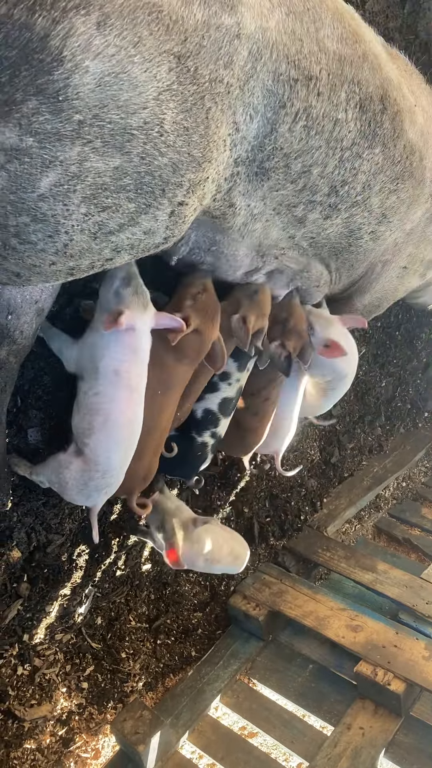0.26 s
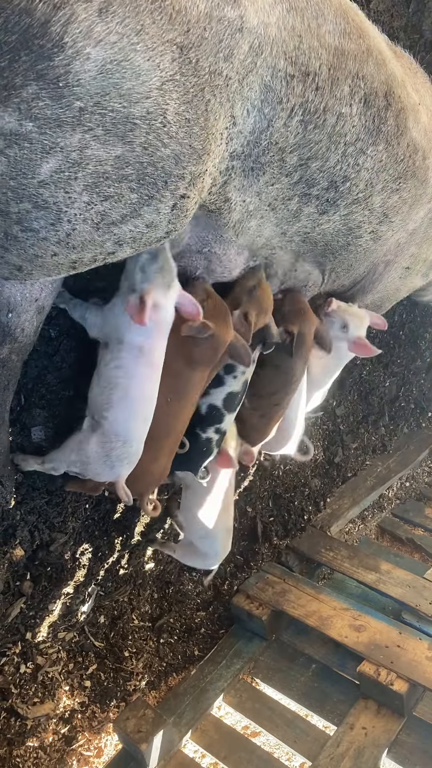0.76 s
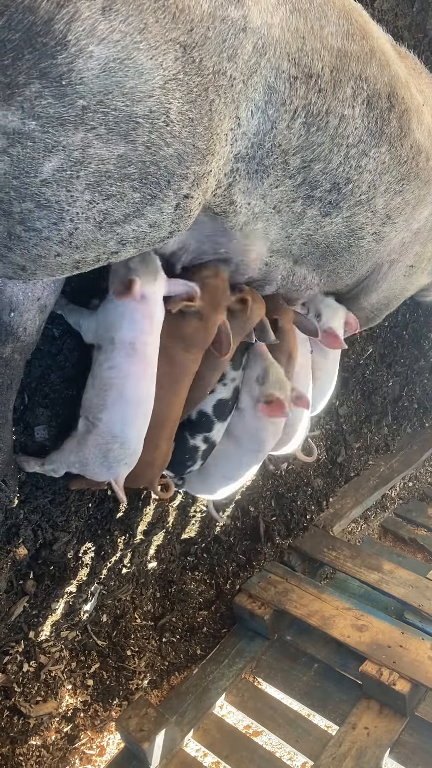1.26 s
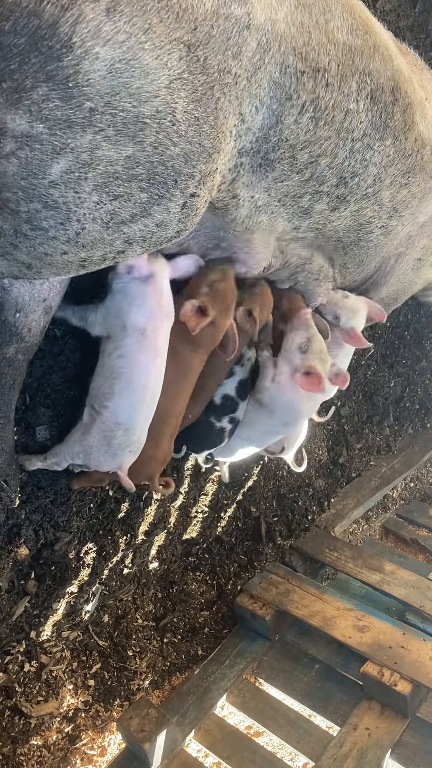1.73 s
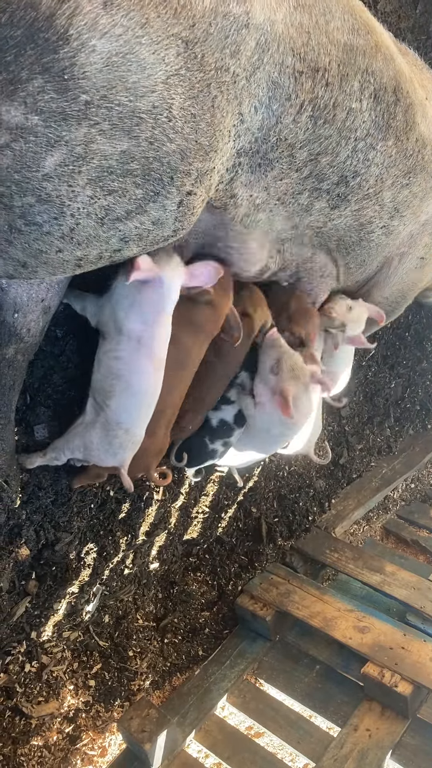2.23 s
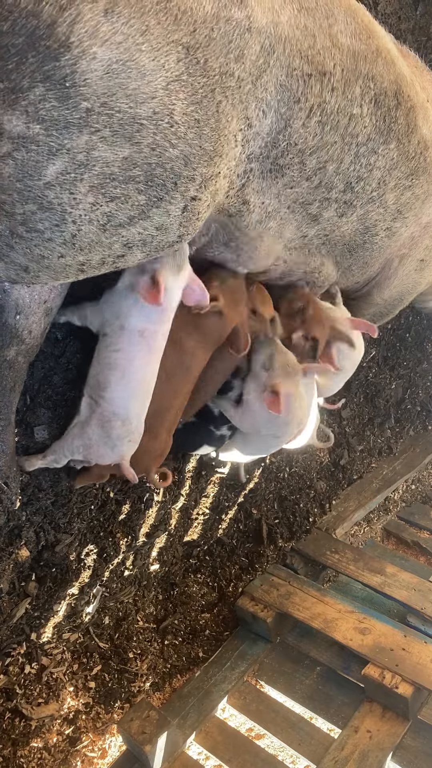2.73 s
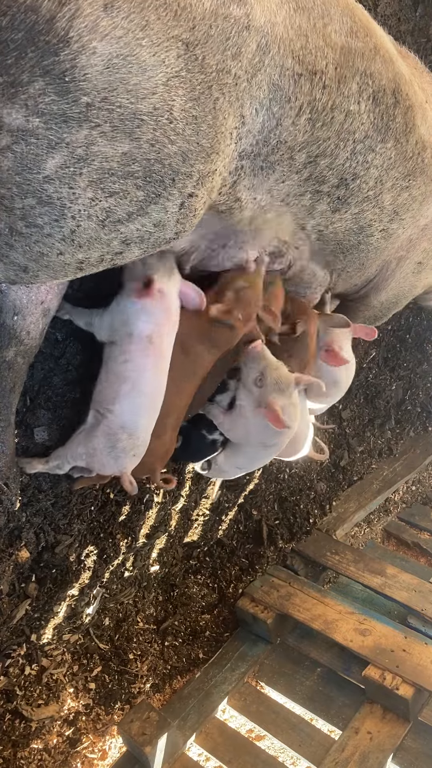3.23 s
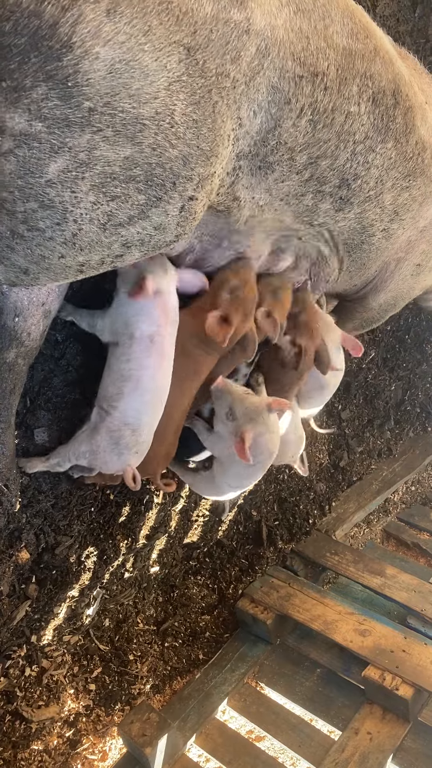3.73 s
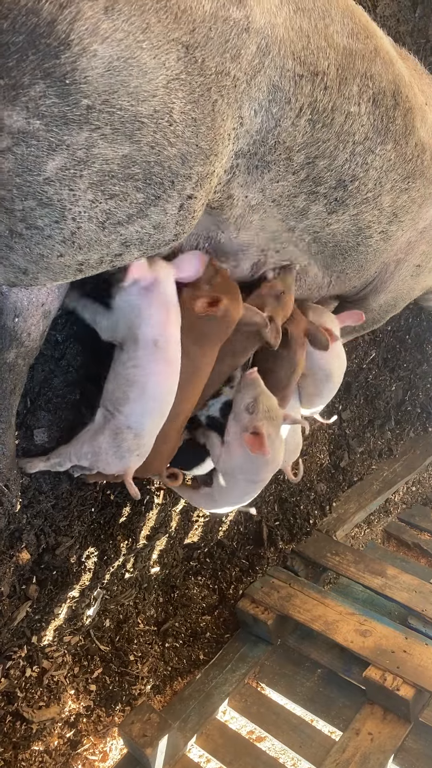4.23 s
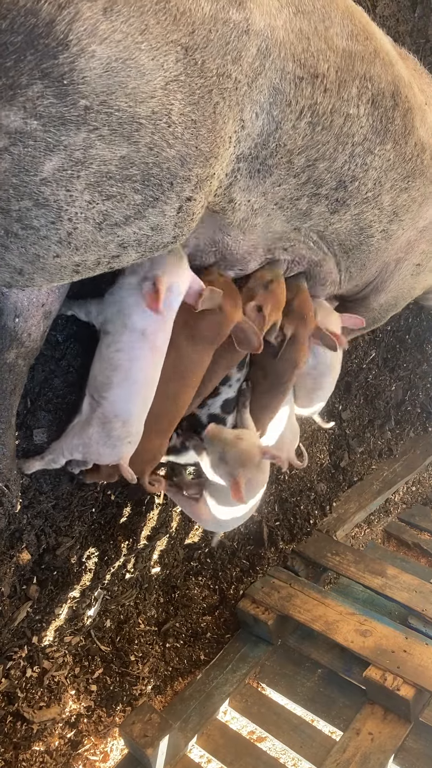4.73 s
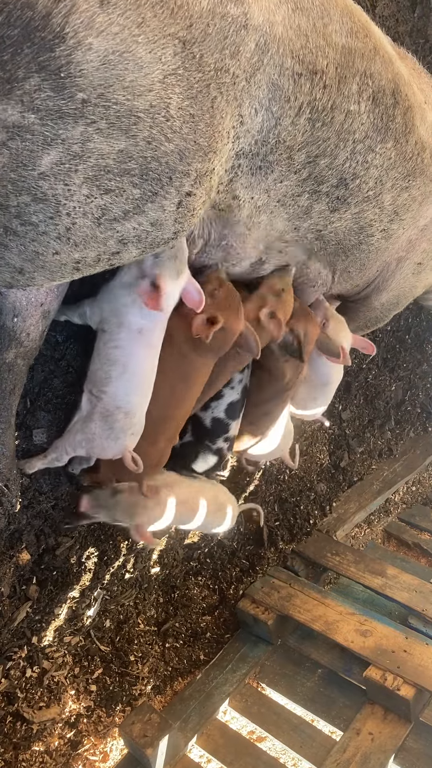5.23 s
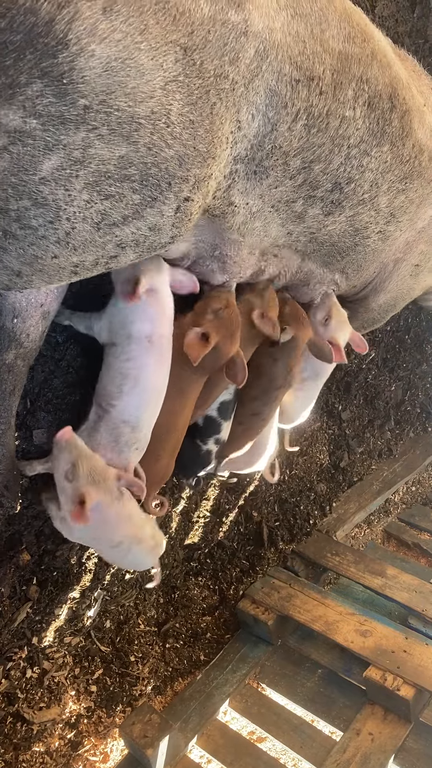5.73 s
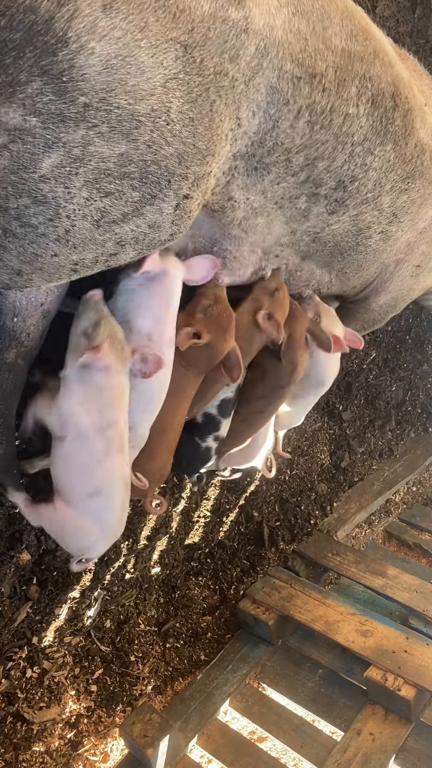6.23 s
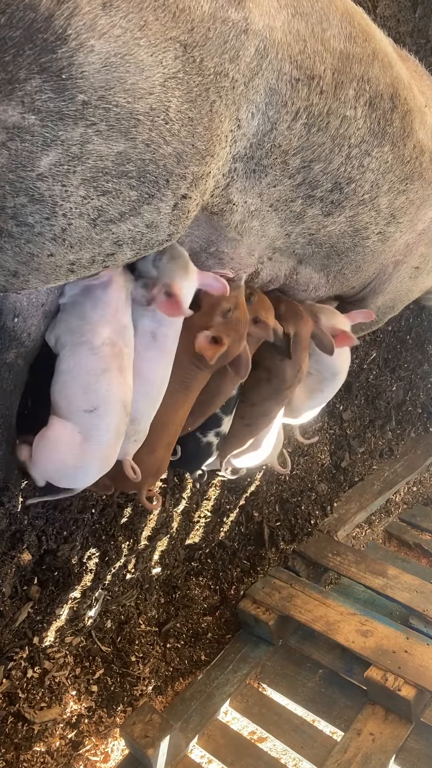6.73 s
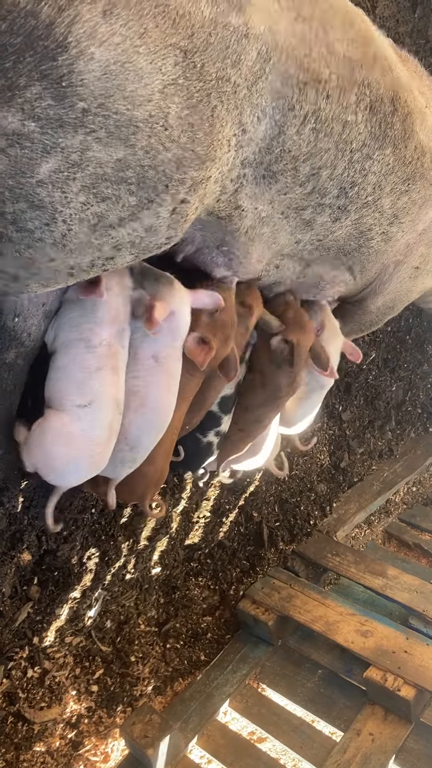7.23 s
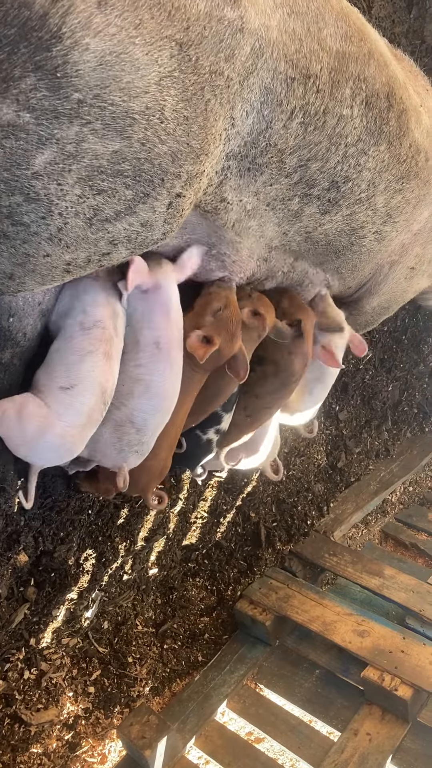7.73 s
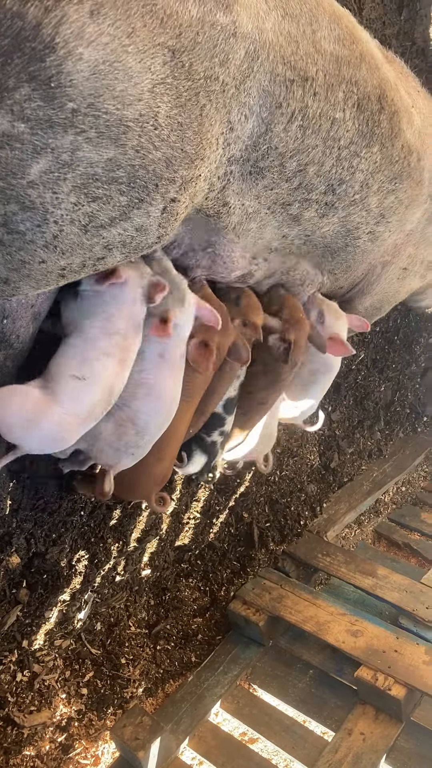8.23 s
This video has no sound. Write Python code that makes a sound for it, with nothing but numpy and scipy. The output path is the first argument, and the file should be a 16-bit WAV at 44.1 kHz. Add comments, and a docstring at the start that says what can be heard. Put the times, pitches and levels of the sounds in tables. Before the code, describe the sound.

Very close to the microphone in a farm shed, a nursing sow gives short, guttural grunts about once a second. Each begins as a rapid flutter and breaks into slower, heavy, wet throat slaps. Suckling piglets add little rubs, smacks and sniffs, with faint squeaks near six seconds. An engine drones steadily some way off above a low rumble.

```python
"""A sow lying close to the microphone grunts about once a second, each grunt a rattle of throat slaps
that starts as a quick flutter and ends in slow, heavy beats; the slaps ring resonances of her body and head.
Around her come small rubs, smacks, sniffs and wheezes (swells of grainy noise), sagging squeaks and a faint rustle.
Some way off an engine runs steadily, tones at multiples of its firing rate plus throbbing clatter;
a low rumble, opposite in sign at the two ports, and faint air noise fill the shed."""
import sys
import numpy as np
from scipy import signal
from scipy.fft import rfft, irfft, next_fast_len
from scipy.io import wavfile
from scipy.ndimage import uniform_filter1d, minimum_filter1d

SR = 44100
rng = np.random.default_rng(int(sys.argv[2]) if len(sys.argv) > 2 else 0)


def file_out(sig):
    """Save sig as 16-bit WAV at sys.argv[1]."""
    # one column per channel
    cols = np.atleast_2d(sig).T
    # limit, then scale
    lim = np.clip(cols, -1, 1)
    pcm = np.round(lim * 32767).astype(np.int16)
    wavfile.write(sys.argv[1], SR, pcm)


N = 373524

# the flutter that opens each grunt:
# [start t/s, end t/s, slap rate f/Hz, first force level/dB, full force level/dB, chest depth level/dB]
GRUNT_FLUTTERS = [(.154, .27, 54, -40, -22, 2), (1.499, 1.54, 54, -44, -25, 0),
                  (2.735, 2.745, 52, -30, -20, 3.5), (3.455, 3.5, 57, -25, -23, 0),
                  (4.364, 4.487, 60, -40, -21, 2.5), (5.365, 5.48, 56, -39, -22, 1),
                  (6.327, 6.37, 56, -39, -22, 1), (7.177, 7.22, 56, -34, -26, 0),
                  (8.073, 8.167, 57, -36, -22, 0)]
# single slaps, strong and weak, heard apart within and at the end of each grunt:
# [t/s, force level/dB, mouth share level/dB, nasal share level/dB, palate share level/dB]
SINGLE_SLAPS = [(0.21, -22, -3, -10, -15.5), (0.244, -22.5, 6, -2, -4.5), (0.28, -20.5, 0, -15, -16.0),
                (0.3, -20, 5, -6.5, -6), (0.329, -28.5, 8, -8, -7), (1.519, -21, -17, -17, -29),
                (1.548, -21, -10.5, -7, -23), (1.566, -18.5, -2, -7, -8.5), (1.585, -19.5, 4, -1, -14.5),
                (1.618, -15.5, 1.5, -5, -21), (1.65, -15.5, 1, -14, -13.5), (1.684, -21.5, 1.5, -11.5, -10),
                (2.75, -15, -2, -8.5, -24), (2.773, -16.5, -1.0, -8, -15), (2.79, -23.0, 6, -8, -3.5),
                (2.812, -16.5, 3, -10.5, -16), (3.455, -22.5, -7, -6.5, -14), (3.507, -20.5, 4.5, -9, -3),
                (3.524, -23.5, 4, 3.5, -2.5), (3.543, -11.5, 4.5, -5.5, 0), (3.581, -14.0, 1, -12.5, -5.5),
                (4.385, -20.5, -14.5, -17.5, -24), (4.429, -21.5, 2, -8.5, -19),
                (4.447, -16.5, 1, -6.5, -9), (4.463, -27, 3, -5, -3), (4.494, -20.5, 4, -3, -5),
                (4.516, -17.5, -2, -7.5, -22), (4.548, -26, 11.0, -4, -0.5),
                (5.401, -19.5, -6, -9.5, -18.0), (5.436, -20, 1.5, -1.5, -12), (5.456, -17.5, -1, -3, -9.5),
                (5.489, -21, 5.5, -7.5, -8), (5.516, -13.5, 1.5, -14.5, -31), (5.548, -20, 6, -6, -8.5),
                (6.38, -20.5, -5, -8.5, -7), (6.402, -13.0, 0, -5.5, -11.5),
                (6.437, -13.5, -0.5, -21.5, -17), (6.455, -19, 1, -2.5, -8.5),
                (6.473, -18.5, 3.5, -4.5, -19), (6.512, -28.5, 1, -4, -8), (7.228, -20, -15, -13, -17),
                (7.248, -24.5, 7, 2.5, -14), (7.265, -23, 4, -1.5, -9), (7.292, -12.0, -1.5, -15.5, -22.5),
                (7.322, -12, -2, -15.5, -9.5), (8.143, -15.5, -5.5, -16.5, -25),
                (8.176, -13, 3.5, -9.5, -15.5), (8.214, -8.5, -10, -16.5, -18), (8.253, -27, -2, -6.5, -14)]
SLAP_S = .008  # a slap's force is its power spread over this time


def from_db(db):
    """Decibels to gain."""
    return 10 ** (np.asarray(db) / 20)


def rms_one(x):
    """Scale to unit power."""
    return x / np.sqrt(np.mean(x ** 2) + 1e-20)


def seconds():
    """The time of every sample."""
    return np.arange(N) / SR


def at_hz(points, hz):
    """Read a table on a log-frequency axis."""
    f, value = np.transpose(points)
    return np.interp(np.log(np.maximum(hz, 1)), np.log(f), value)


def drift(rate):
    """Slow chance of spread 1 with so many turns a second."""
    return np.interp(seconds() * rate, np.arange(16000), rng.standard_normal(16000))


def shaped(x, response):
    """Filter by a response given as a function of frequency."""
    size = next_fast_len(N + 4096)
    return irfft(rfft(x, size) * response(np.fft.rfftfreq(size, 1 / SR)), size)[..., :N]


def ports(shared, apart):
    """Two microphone ports hear a sound partly alike, partly apart, by frequency."""
    # likeness of the two ports: [f/Hz, share 0-1]
    port_likeness = [(45, .1), (65, 1), (100, 1), (350, 0.94), (550, 0.13), (750, 0.12), (1200, 1),
                     (2000, 0.39), (4000, 0.6), (8000, 1)]

    def alike(hz):
        """How far the ports agree at each frequency."""
        return np.clip(at_hz(port_likeness, hz), 0, 1)

    mid = shaped(shared, lambda hz: np.sqrt((1 + alike(hz)) / 2))
    side = shaped(apart, lambda hz: np.sqrt((1 - alike(hz)) / 2))
    return np.array([mid + side, mid - side])


def noise(spectrum):
    """Stereo noise of a given colour; rms 1."""
    white = ports(*rng.standard_normal((2, N)))
    return rms_one(shaped(white, lambda hz: from_db(at_hz(spectrum, hz))))


def resonance(x, hz, width):
    """A two-pole resonance with gain 1 on top."""
    r = np.exp(-np.pi * width / SR)
    zeros = np.array([1, 0, -1]) * (1 - r * r) / 2
    poles = [1, -2 * r * np.cos(2 * np.pi * hz / SR), r * r]
    return signal.lfilter(zeros, poles, x + 1e-18)


def fade(clicks, decay_s):
    """Each click becomes an envelope that dies away."""
    return signal.lfilter([1], [1, -np.exp(-1 / (decay_s * SR))], clicks + 1e-18)


def strike(times, level_db):
    """A train of clicks."""
    clicks = np.zeros(N)
    clicks[(times * SR).astype(int)] = from_db(level_db)
    return clicks


def shed_air(air_db=-49.0, stir_db=3.5):
    """The air of the shed: coloured noise whose level drifts slowly."""
    # colour of the air: [f/Hz, relative level/dB per Hz]
    air_colour = [(1000, 6.5), (1900, 0.5), (2800, 4), (3400, 0), (4300, -5.5), (6000, -18.5), (8000, -17),
                  (9800, -11.5), (12000, -18), (14000, -47), (15500, -40)]
    return from_db(air_db + stir_db * drift(rate=2.682)) * noise(air_colour)


def opposite_rumble(rumble_db=-49.5):
    """Low random rumble, opposite in sign at the two ports."""
    # colour of the rumble: [f/Hz, relative level/dB per Hz]
    rumble_colour = [(15, -21), (32, 0), (50, -5), (95, 4), (140, -8), (250, -23), (600, -49), (2000, -90)]
    rumble = rms_one(shaped(rng.standard_normal(N), lambda hz: from_db(at_hz(rumble_colour, hz))))
    return from_db(rumble_db) * np.array([rumble, -rumble])


def engine(clatter_db=-34.0, throb=0.19, waver_db=1.36, apart_rad=0.2):
    """Steady firing tones, the lowest out of step between the ports, and a clatter that swells with every firing."""
    firing_hz = 32.49
    # engine tones: [multiple of the firing rate]
    engine_orders = [1, 2, 2.75, 3, 3.25, 4, 4.75, 5, 5.5, 6, 8, 10, 11, 12, 13]
    # mean level of each tone before its waver: [rms level/dB]
    engine_levels_db = [-41, -55.5, -38.5, -39, -47.5, -42.5, -49.5, -50.5, -46.5, -46.5, -53, -52, -50.5,
                        -57, -50]
    # colour of the clatter: [f/Hz, relative level/dB per Hz]
    clatter_colour = [(45, 0), (64, -0.5), (80, -5.5), (105, -0.5), (170, 2), (230, -9), (310, -8),
                      (400, -2.5), (490, -9), (750, -5.5), (880, -5.5), (1020, -23), (1300, -16),
                      (1900, -28), (3000, -56.5)]
    turn = 2 * np.pi * (firing_hz * seconds() + 0.0072 * drift(rate=2.896))
    tones = 0
    for multiple, level_db in zip(engine_orders, engine_levels_db):
        phase = 2 * np.pi * rng.random() + np.array([[-apart_rad / multiple ** 2], [0]])
        level = from_db(level_db + waver_db * drift(rate=4.4))
        tones = tones + level * np.sqrt(2) * np.cos(multiple * turn + phase)
    clatter = noise(clatter_colour) * (1 + throb * np.cos(turn))
    clatter = signal.sosfilt(signal.butter(4, 42, "high", fs=SR, output="sos"), clatter)
    return tones + from_db(clatter_db) * clatter


def bedding(rustle_db=-65.5):
    """Small shifts of the litter keep up a faint rustle that comes and goes."""
    # colour of the rustle: [f/Hz, relative level/dB per Hz]
    rustle_colour = [(4000, -5.5), (7000, 0.5), (9500, -6), (12000, -11), (15500, -13)]
    stirring_db = 3 * drift(rate=9) + 2.5 * drift(rate=120)
    return from_db(rustle_db + stirring_db) * noise(rustle_colour)


def small_noises(grain_db=3.0):
    """Small rubs, smacks, sniffs and wheezes from the sow and litter, each a swell of grainy noise."""
    # swells, before the grain: [middle t/s, half length t/s, level/dB, centre f/Hz, width/octaves]
    noise_swells = [(0.12, 0.11, -63, 8730, 0.37), (0.702, 0.051, -56.5, 9600, 0.7),
                    (1.462, 0.013, -57.5, 9000, 0.41), (2.284, 0.064, -48, 6850, 0.61),
                    (2.682, 0.029, -52, 6700, 0.53), (2.679, 0.029, -47, 2050, 0.25),
                    (4.37, 0.068, -44, 10600, 0.37), (4.766, 0.007, -56, 10500, 0.28),
                    (5.195, 0.023, -58, 5480, 0.95), (5.325, 0.066, -55, 9150, 0.86),
                    (5.59, 0.0076, -39, 6500, 0.27), (6.149, 0.23, -63, 9400, 0.69),
                    (6.193, .05, -56, 4000, 0.29), (6.519, 0.0094, -51, 8600, 0.79),
                    (6.768, 0.014, -52, 9000, 0.98), (7.193, 0.018, -48, 10000, 1),
                    (7.812, 0.044, -53, 10100, 0.68), (1.727, 0.0055, -46.5, 7000, 0.47),
                    (2.298, .05, -53, 4400, .5), (5.2, .025, -55, 3600, .4),
                    (7.366, 0.0066, -46.5, 7040, 0.27)]
    t, out = seconds(), np.zeros(N)
    hz = np.fft.rfftfreq(SR, 1 / SR) + 1
    for middle, half, level_db, centre_hz, octaves in noise_swells:
        near = np.abs(t - middle) < .4
        colour = 1 / (1 + (np.log2(hz / centre_hz) / octaves) ** 2 / 2) ** 2
        hiss = rms_one(irfft(rfft(rng.standard_normal(SR)) * colour))[:near.sum()]
        swell = np.exp(-((t[near] - middle) / half) ** 2)
        out[near] += from_db(level_db) * hiss * swell
    return out * from_db(grain_db * drift(rate=140))


def squeak(flicker_db=2.5, sag_hz_per_s=1400):
    """Narrow, hoarse whistles from the litter that swell, fade and sag in pitch."""
    # squeaks, before flicker and port gain: [middle t/s, half length t/s, f/Hz, peak level/dB, waver f/Hz]
    squeak_events = [(6.068, .018, 4750, -52, 50), (6.1, .065, 4110, -54, 200),
                     (6.19, .055, 4590, -54.5, 260), (6.14, .025, 3330, -56, 220)]
    t, out = seconds(), 0
    for middle, half, hz, level_db, waver_hz in squeak_events:
        pitch = hz - sag_hz_per_s * (t - middle) + waver_hz * drift(rate=620)
        swell = np.exp(-((t - middle) / half) ** 2)
        level = from_db(level_db + flicker_db * drift(rate=110)) * swell
        out = out + level * np.sin(2 * np.pi * np.cumsum(pitch) / SR)
    return out


def shed(x, early_db=-10.0, early_s=.013, tail_db=-16.0, tail_t60_s=0.13, wall_cut_hz=4500):
    """Floor and boards throw back a quick scatter of echoes, then a short diffuse tail."""
    t = np.arange(SR // 2) / SR
    scatter = rng.standard_normal((2, len(t))) * (rng.random((2, len(t))) < .03)
    scatter = scatter * np.exp(-t / early_s) * (t > .003)
    tail = rng.standard_normal((2, len(t))) * from_db(-60 * t / tail_t60_s) * (t > .01)
    echoes = 0
    for db, part in [(early_db, scatter), (tail_db, tail)]:
        echoes = echoes + from_db(db) * part / np.linalg.norm(part, axis=1, keepdims=True)
    reflected = signal.fftconvolve(x, echoes, axes=1)[:, :N]
    return signal.sosfilt(signal.butter(1, wall_cut_hz, fs=SR, output="sos"), reflected)


def last_slaps():
    """The last single slap of each grunt."""
    single = np.array(SINGLE_SLAPS)
    return single[np.diff(single[:, 0], append=np.inf) > .5]


def in_grunt(times):
    """For each slap: its grunt's age (s), how far through it comes (0-1), and the grunt's chest depth (dB)."""
    starts, *_, depth_db = np.transpose(GRUNT_FLUTTERS)
    own = np.abs(times[:, None] - starts).argmin(axis=1)
    age = times - starts[own]
    lengths = last_slaps()[:, 0] - starts
    return age, np.clip(age / lengths[own], 0, 1), depth_db[own]


def slaps(jitter_s=.001, uneven_db=1.5, swell_s=0.039, trail_s=.037, trail_loss_db=23.5):
    """A swelling flutter gives way to single slaps and a weak trailing one; rows as in SINGLE_SLAPS."""
    # shares of a flutter slap: [mouth share level/dB, nasal share level/dB, palate share level/dB]
    flutter_shares = [-9, -10, -16]
    single, trail = np.array(SINGLE_SLAPS), last_slaps()
    trail[:, :2] += [trail_s, -trail_loss_db]
    rows = [*single, *trail]
    for start, end, rate, first_db, full_db, _ in GRUNT_FLUTTERS:
        age = np.arange(12) / rate
        times = start + age
        late, stronger = rng.standard_normal((2, len(age)))
        force_db = np.interp(age, [0, swell_s], [first_db, full_db]) + uneven_db * stronger
        shares_db = np.tile(flutter_shares, (len(age), 1))
        flutter = np.column_stack([times + jitter_s * late, force_db, shares_db])
        # before the jitter, no flutter slap stands within half a period of a single one
        free = np.abs(times[:, None] - single[:, 0]).min(axis=1) > .5 / rate
        rows.extend(flutter[(times < end) & free])
    return np.array(rows)


def tract(times, level_db, modes, rough, puff_s, vary_db, stretch, glide=0):
    """Each slap and its puff of air ring resonances that stretch anew every time and may glide through the grunt."""
    t, out = np.arange(SR // 8) / SR, np.zeros(N + SR)
    tuning = 1 + glide * (in_grunt(times)[1] - .5)
    for s, slap_db, puff, tuned in zip(times, level_db, rough * np.ones(len(times)), tuning):
        drive = (t == 0) + puff * rng.standard_normal(len(t)) * np.exp(-(t / puff_s) ** 2)
        ring = 0
        for k, (hz, width, mode_db) in enumerate(modes):
            sharper, louder = rng.standard_normal(2)
            hz = hz * tuned * (1 + stretch * sharper)
            # two passes round the attack, as soft flesh does, and deepen the valleys
            twice = resonance(resonance(drive, hz, width), hz, width)
            ring = ring + (-1) ** k * from_db(mode_db + vary_db * louder) * twice
        force = np.sqrt(np.sum(ring ** 2) / (SLAP_S * SR))
        out[int(s * SR):][:len(t)] += from_db(slap_db) * ring / force
    return out[:N]


def hollowed(x):
    """Side cavities of the head swallow narrow bands between the resonances."""
    # swallowed pitches: [f/Hz, width f/Hz]
    side_cavities = [(228, 5.6), (680, 19), (1142, 39), (1590, 47), (1985, 87), (3430, 250)]
    for hz, width in side_cavities:
        x = signal.lfilter(*signal.iirnotch(hz, hz / width, fs=SR), x + 1e-18)
    return x


def rasp(times, level_db, rasp_db=-6.0, linger_s=0.013):
    """Hoarse air rushes through the snout, building just before each slap and lingering after it."""
    # colour of the hoarse air: [f/Hz, relative level/dB per Hz]
    rasp_colour = [(500, -16), (1000, 16), (1620, 9.5), (1860, 16), (2020, -12), (2320, -27), (2850, 1.5),
                   (3170, 12), (3440, -22), (3610, 6.5), (4000, -54)]
    flow = uniform_filter1d(fade(strike(times, level_db + rasp_db), linger_s), size=600)
    return flow * from_db(2 * drift(rate=500)) * noise(rasp_colour)


def spray(times, level_db):
    """The short wet spray of each slap: a dying burst of noise of uneven strength."""
    # colour of the spray: [f/Hz, relative level/dB per Hz]
    spray_colour = [(2500, 19), (4000, 6.5), (4400, 2), (6000, 6.5), (7000, 4.5), (9500, -2.5),
                    (13000, -12), (15500, -29)]
    wet = fade(strike(times, level_db + 2 * rng.standard_normal(len(times))), decay_s=0.014)
    return uniform_filter1d(wet, size=260) * noise(spray_colour)


def sow(chest_db=-19.0, windpipe_db=-22.0, throat_db=2.04, snout_db=0.5, crack_db=-13.0,
        nostril_db=-14.5, spray_db=-9.5, snort_db=-36.5, snort_s=.11, flesh_cut_hz=4000):
    """Slaps crack and sound from chest to snout, with an opening snort, hoarse air and wet spray."""
    # resonances, before each slap's own stretch and glide: [f/Hz, width of one pass f/Hz, relative level/dB]
    chest_modes, windpipe_modes = [(282, 72, 0)], [(63, 67, -5), (545, 60, -1.5), (743, 48, -5.5),
                                                  (807, 32, -2)]
    throat_modes, mouth_modes = [(1003, 105, 0)], [(1075, 90, -9), (1240, 105, 4), (1355, 70, -4),
                                                 (1488, 64, 3)]
    palate_modes, snout_modes = [(2166, 106, 1), (2342, 85, -2), (2600, 320, -10.5)], [(1705, 70, -7), (1857, 48, 4)]
    # dry crack of a slap, bite of the nostrils, breathy snort high in the nose: same columns
    crack_modes, nostril_modes, snort_modes = [(1220, 820, 1), (2220, 600, -6)], [(2950, 200, -7), (3250, 190, 0),
                                                              (3640, 170, -3)], [(1480, 160, -2),
                                                                                (1740, 190, 0),
                                                                                (2185, 260, 0),
                                                                                (3110, 220, -9)]

    times, force_db, mouth_share_db, nasal_share_db, palate_share_db = slaps().T
    age, through, depth_db = in_grunt(times)
    # the chest follows the force only partly, and is fullest part way through a grunt
    push_db = 0.24 * (force_db + 14.5)
    arch_db = depth_db - 29.5 * (through - 0.58) ** 2
    # a slap is the more ragged the more of it goes through the nose
    ragged = from_db(0.36 * (nasal_share_db + 13))
    nasal_db = force_db + nasal_share_db
    half_nasal_db = force_db + nasal_share_db / 2

    chest = tract(times, chest_db + arch_db + push_db, chest_modes,
                  rough=.02, puff_s=.02, vary_db=0, stretch=.025, glide=.08)
    windpipe = tract(times, windpipe_db + 2 * push_db, windpipe_modes,
                     rough=.02, puff_s=.015, vary_db=2.5, stretch=.02)
    throat = tract(times, force_db + throat_db, throat_modes,
                   rough=.025 * ragged, puff_s=.008, vary_db=0, stretch=.014, glide=-.02)
    mouth = tract(times, force_db + mouth_share_db, mouth_modes,
                  rough=.032 * ragged, puff_s=.009, vary_db=2, stretch=.009)
    palate = tract(times, force_db + palate_share_db, palate_modes,
                   rough=.05 * ragged, puff_s=.009, vary_db=3, stretch=.008)
    snout = tract(times, nasal_db + snout_db, snout_modes,
                  rough=.05 * ragged, puff_s=.011, vary_db=2, stretch=.005)
    crack = tract(times, force_db + palate_share_db / 3 + crack_db, crack_modes,
                  rough=.1, puff_s=.003, vary_db=2, stretch=.05)
    nostrils = tract(times, half_nasal_db + nostril_db, nostril_modes,
                     rough=.15, puff_s=.012, vary_db=3, stretch=.012)
    # the snort falls by 20 dB every snort_s
    snort = from_db(snort_db) * tract(times, -20 * age / snort_s, snort_modes,
                                      rough=.2, puff_s=.008, vary_db=1, stretch=.015)
    voice = chest + windpipe + throat + mouth + palate + snout + crack + nostrils + snort
    voice = signal.sosfilt(signal.butter(6, flesh_cut_hz, fs=SR, output="sos"), voice)
    wet = spray(times, half_nasal_db + spray_db)
    return hollowed(voice + rasp(times, nasal_db)) + wet


def scene(left_db=-0.5):
    """The sow and her litter close by, the engine, the rumble and the air behind them."""
    background = shed_air() + opposite_rumble() + engine()
    # the squeaks are weaker at the right port
    litter = bedding() + small_noises() + squeak() * from_db([[0], [-9]])
    voice = sow()
    grunts = (voice + ports(*shed(voice))) * from_db([[left_db], [0]])
    return background + litter + grunts


def record(dry, ceiling=.93, cutoff_hz=15400):
    """The left port has its own colour and lag; a limiter holds the loudest peaks; the top is cut."""
    # left port's colour, weaker in the low middle: [f/Hz, level/dB]
    left_colour = [(100, -.8), (380, -.3), (570, -5.5), (800, -1.5), (1100, -.3), (8000, 0)]
    # phase by which the left port lags: [f/Hz, lag/rad]
    left_lag = [(100, .15), (300, .22), (450, .6), (600, 1.1), (860, 1.9), (1120, 2.0), (1380, 2.2),
                (1890, .7), (2200, 1.3), (2600, 2.6), (4000, 3.1), (6000, 2.8), (8500, 0), (11500, -3),
                (14500, -6)]
    left = shaped(dry[0], lambda hz: from_db(at_hz(left_colour, hz)) * np.exp(-1j * at_hz(left_lag, hz)))
    heard = np.array([left, dry[1]])
    # the ceiling is a share of full scale; the gain eases in ahead of each peak
    room_left = ceiling / np.maximum(np.abs(heard).max(axis=0), ceiling)
    held = minimum_filter1d(room_left, size=400)
    gain = uniform_filter1d(uniform_filter1d(held, size=200), size=200)
    return signal.sosfilt(signal.ellip(10, .1, 80, cutoff_hz, fs=SR, output="sos"), heard * gain)


dry = scene()
out = record(dry)
file_out(out)
```